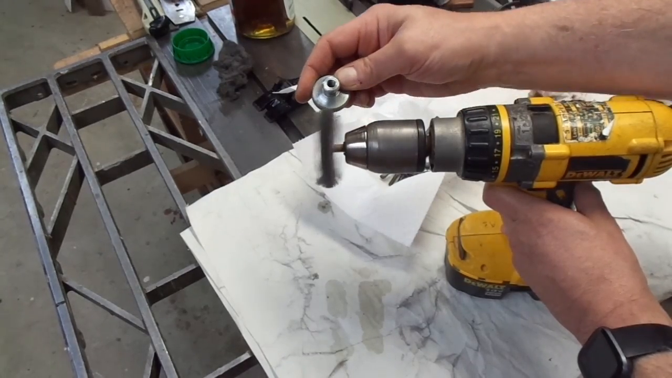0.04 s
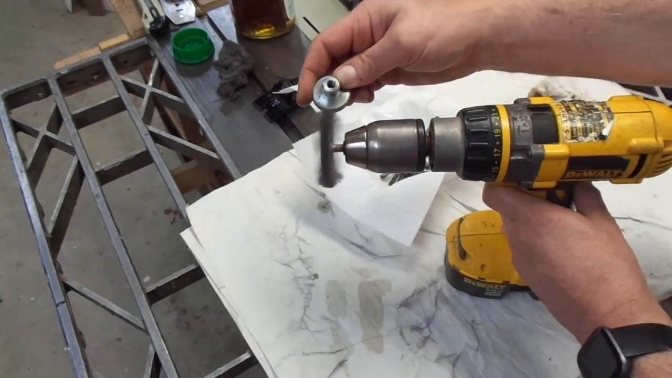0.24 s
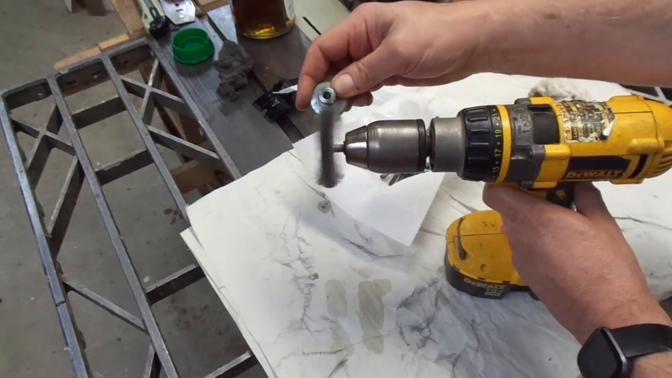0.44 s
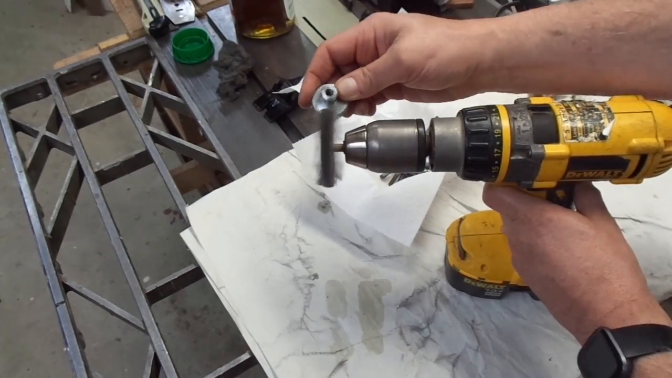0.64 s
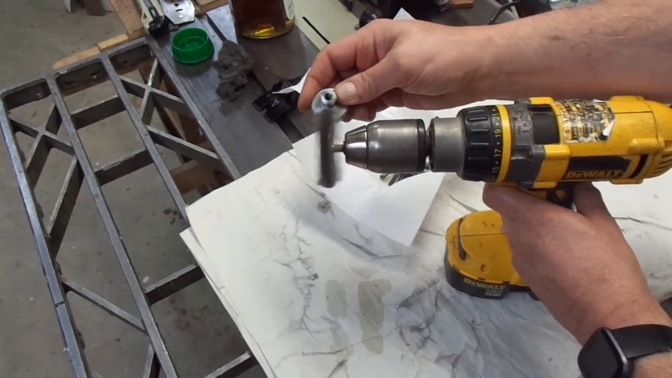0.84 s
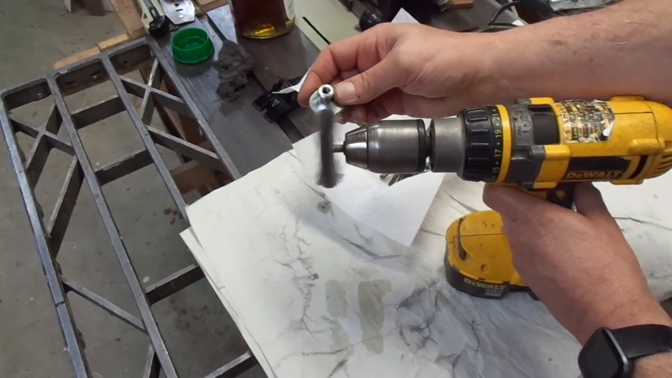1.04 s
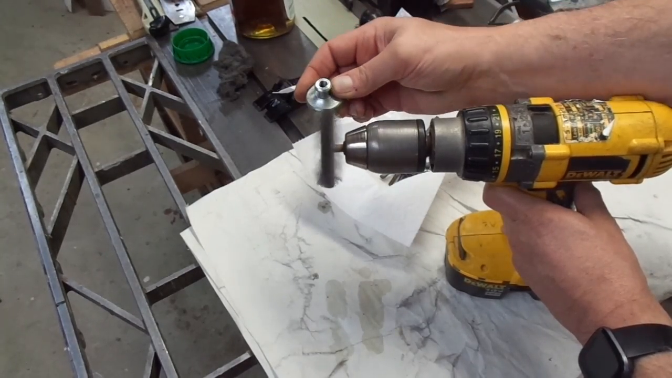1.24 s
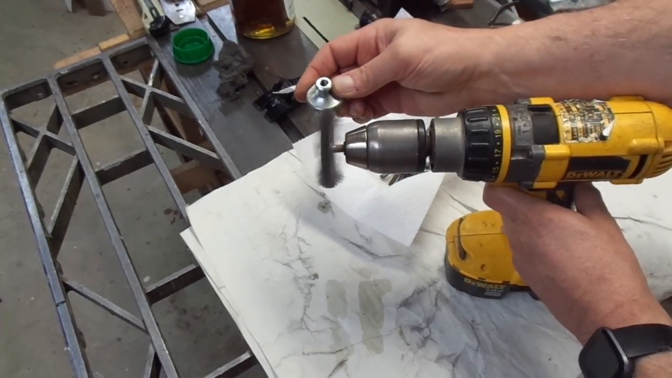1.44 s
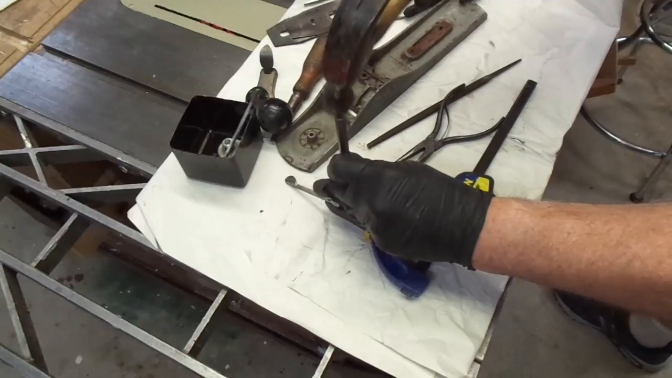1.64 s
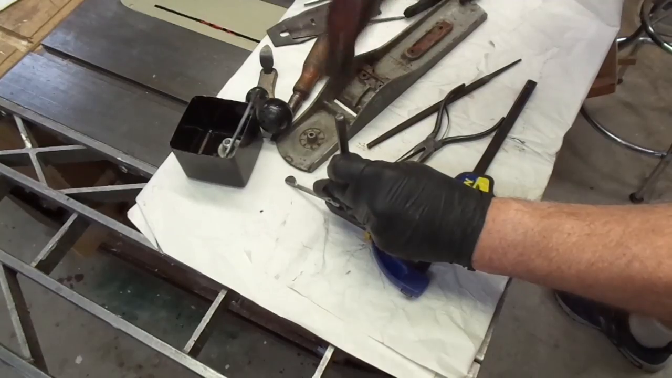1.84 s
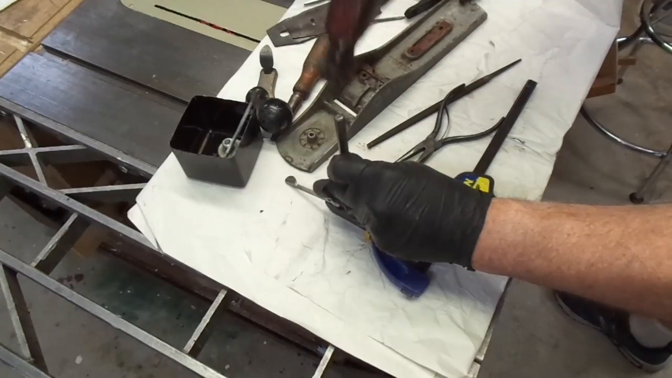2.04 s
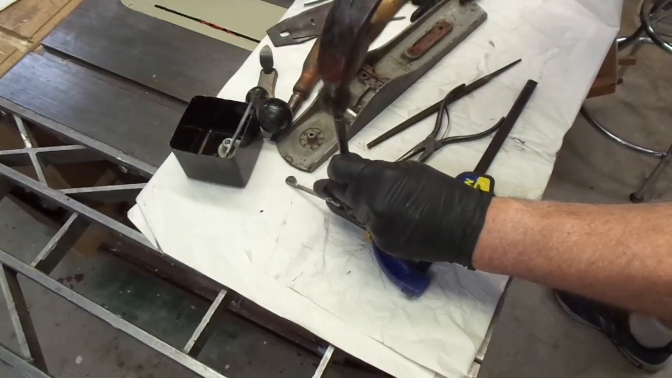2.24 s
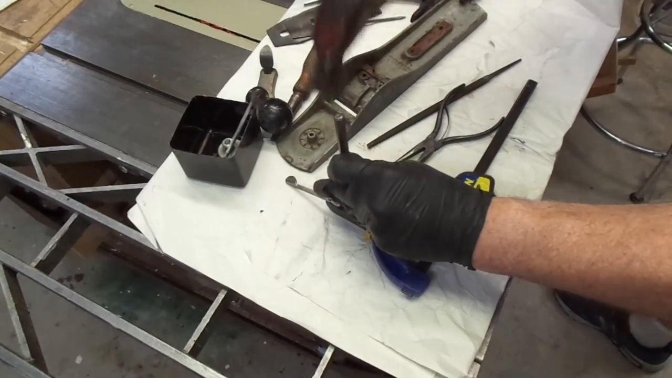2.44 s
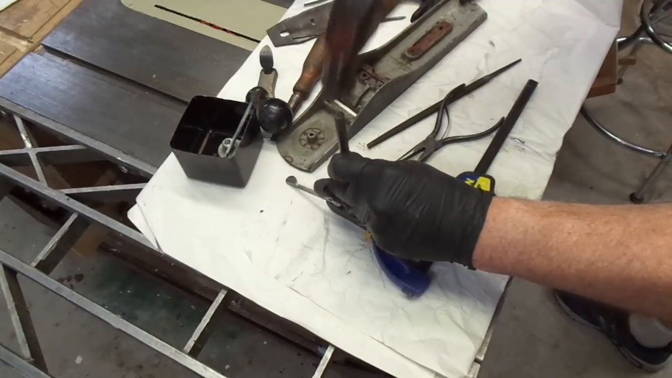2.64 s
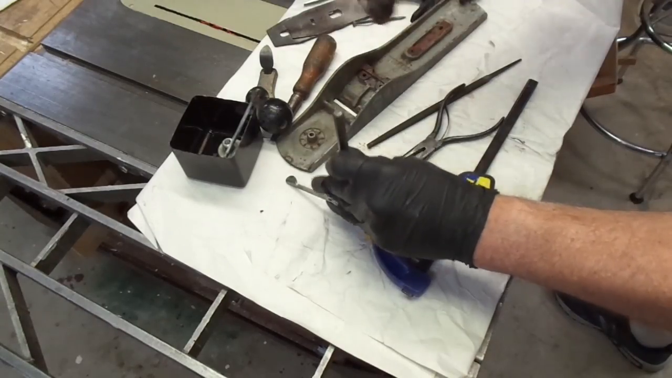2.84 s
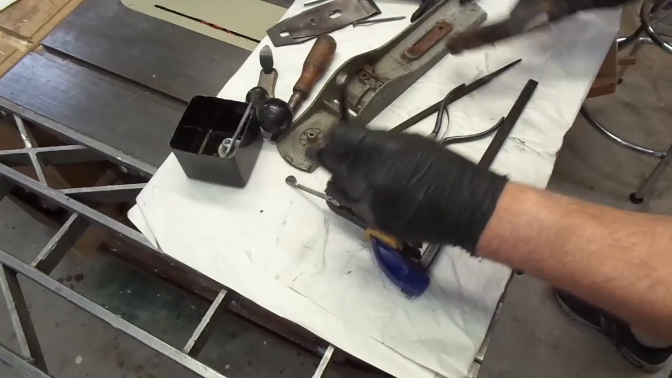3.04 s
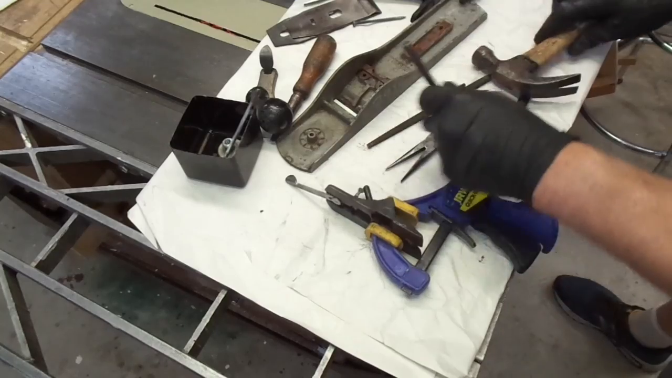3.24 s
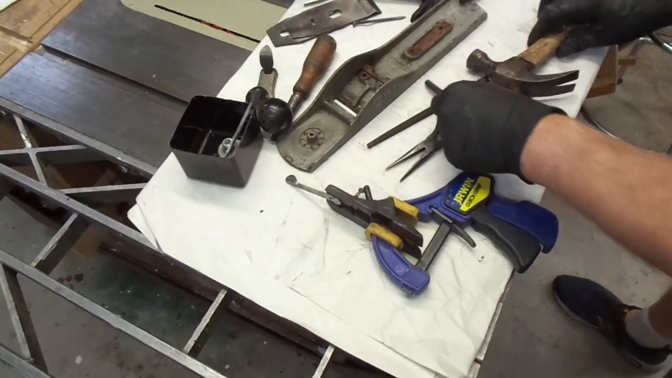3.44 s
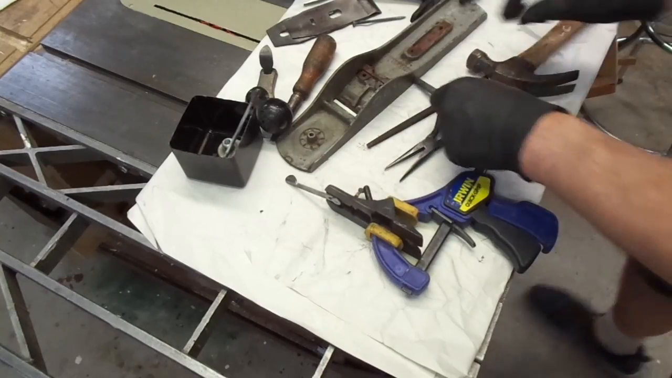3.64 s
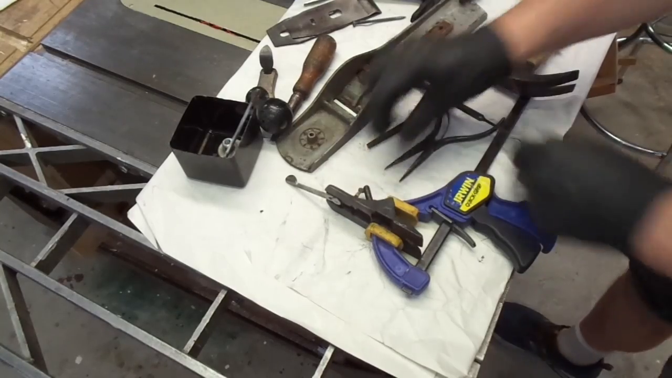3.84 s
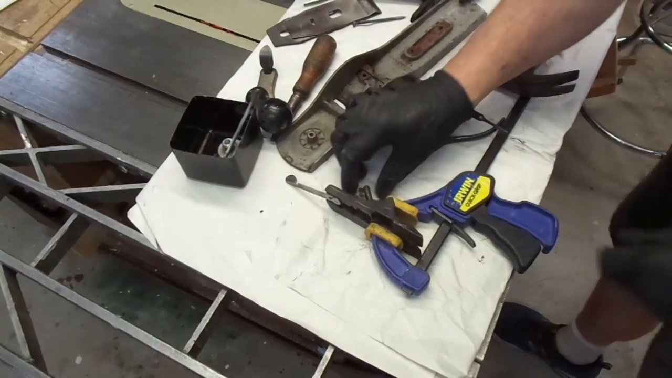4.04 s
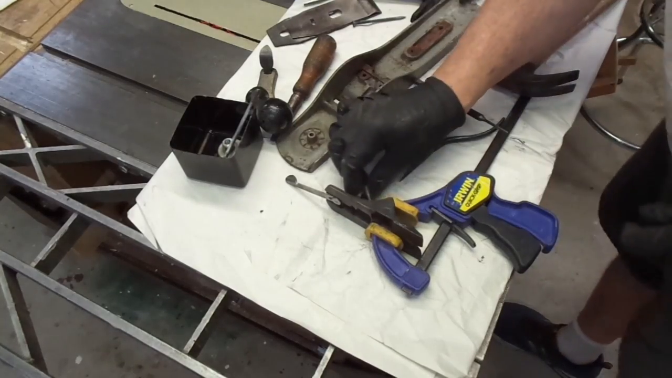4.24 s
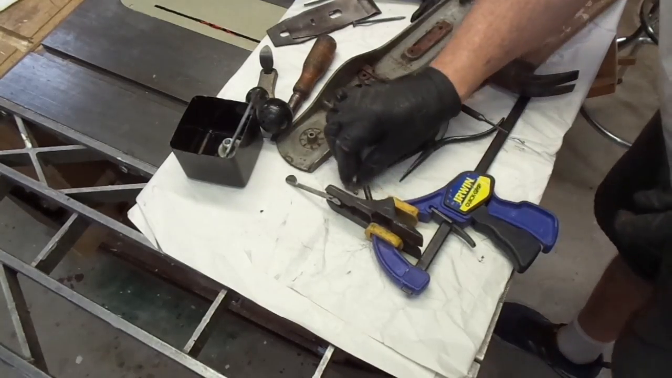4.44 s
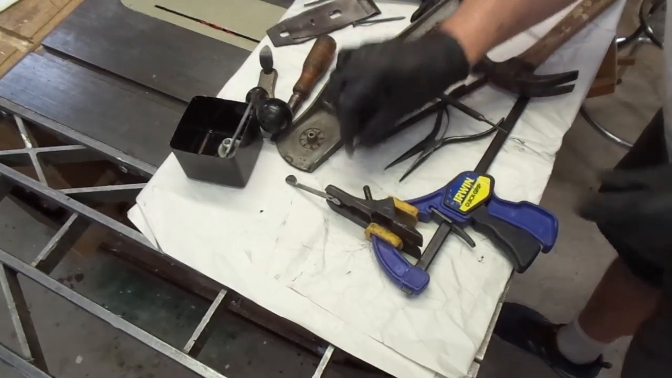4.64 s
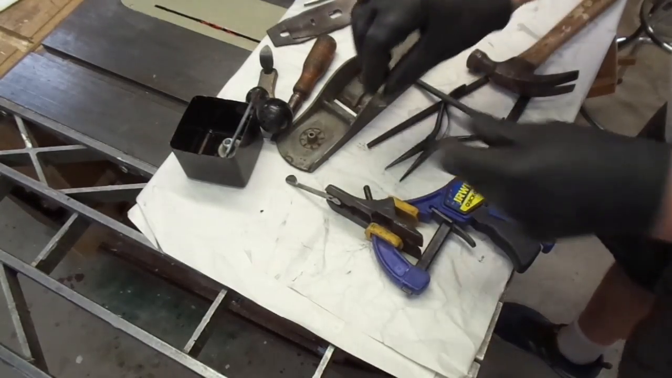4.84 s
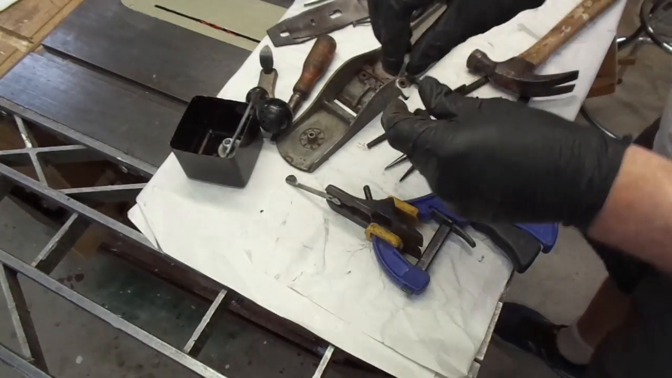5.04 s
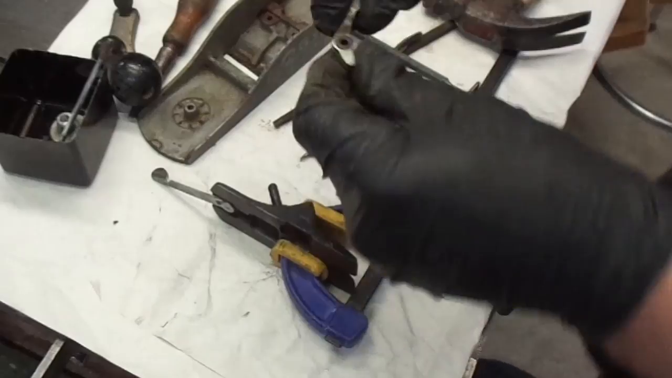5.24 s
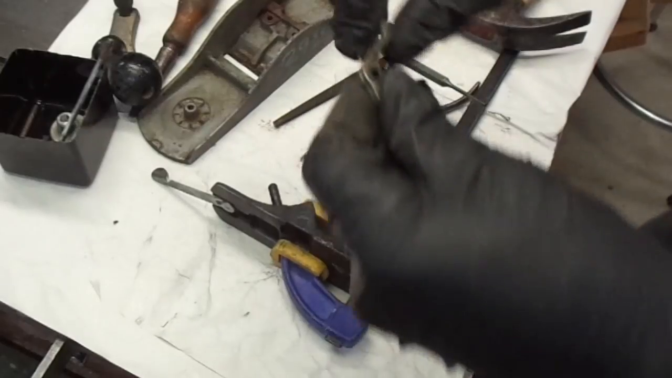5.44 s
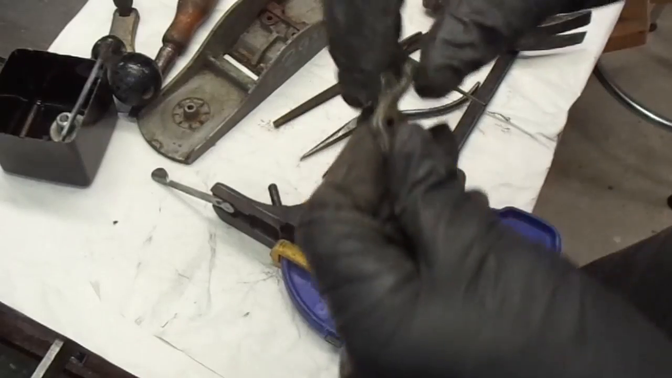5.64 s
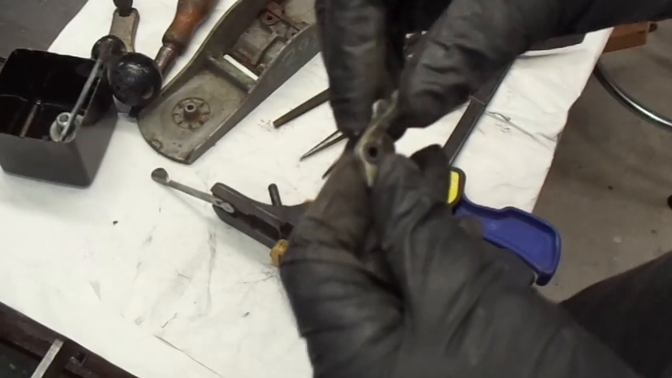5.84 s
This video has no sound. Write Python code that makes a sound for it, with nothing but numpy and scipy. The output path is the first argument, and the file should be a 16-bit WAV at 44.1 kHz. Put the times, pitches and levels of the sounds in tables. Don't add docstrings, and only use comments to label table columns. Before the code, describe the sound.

A cordless drill spinning a wire brush whines high over rough gear roar and bristle hiss, sagging under load and fading out by about a second and a half. Then a quiet humming workshop: four loud, evenly spaced hammer blows on a steel punch, clanging briefly. The hammer is laid down, the punch drops with a click, and gloves rustle. Close microphone, with smeared, watery sped-up treble.

```python
import sys
import numpy as np
from scipy import signal
from scipy.fft import rfft, irfft, next_fast_len
from scipy.io import wavfile
from scipy.ndimage import uniform_filter1d, map_coordinates

SR = 44100
rng = np.random.default_rng(int(sys.argv[2]) if len(sys.argv) > 2 else 0)


def to_linear_factor(level_db):
    exponent = np.asarray(level_db, float) / 20
    return 10 ** exponent


def unload_wav(signal):
    wavfile.write(
        sys.argv[1],
        SR,
        np.round(np.clip(np.atleast_2d(signal).T, -1, 1) * 32767).astype(np.int16),
    )


N = 260631

# time [s], frequency [Hz].
MESH_PITCH = [(0, 1023), (.33, 1019), (.45, 1008), (.52, 980), (.63, 966), (.72, 972), (.8, 962),
              (.88, 942), (1.0, 928), (1.15, 934), (1.58, 932)]
# time [s], level [dB].
TOOTH_LOAD = [(0, 2), (.2, 2), (.3, -5), (.48, -5), (.55, 3), (.66, 2), (.75, -5), (.85, -2), (.92, 4),
              (1.06, 3), (1.15, -4), (1.3, 2)]
CHUCK_ORDERS = [12, 16, 20, 24, 28, 32, 33, 36, 40, 48, 49, 52, 57, 60, 80]
CHUCK_ORDER_DB = [-22, -9, -2, -9.5, -1, -2.5, -11.5, -6, -21, -7.5, 0.5, -1, -5.5, -3, -13.5]
# time [s], frequency [Hz].
WHINE_PITCH = [(0, 4840), (.24, 4835), (.37, 4805), (.44, 4875), (.6, 4930), (.74, 4995), (.85, 4965),
               (.95, 5018), (1.58, 5035)]
# time [s], drag [s], sag of the whine [Hz].
BITES = [(.085, .06, 28), (.17, .04, 28), (.3, .04, 28), (.465, .025, 40), (.686, .085, 155),
         (.884, .035, 105), (1.046, .09, 150), (1.16, .04, 60), (1.21, .04, 50), (1.34, .04, 35)]
# share of the whine pitch [ratio], level over the casing [dB].
ROTOR_TONES = [(.525, -13), (0.61, -19), (.485, -20)]
# frequency [Hz], density [dB per Hz].
CASING_ROAR = [(20, -23), (65, -40), (120, -20.5), (294, -25.5), (348, -6), (392, -17), (442, -14.5),
               (487, -10), (590, -4), (1050, -5), (1400, -5.5), (1650, -10), (2550, -4), (4540, -6.5),
               (4880, -1.5), (6200, -12.5), (8060, -42), (13600, -120)]
# frequency [Hz], density [dB per Hz].
BRISTLE_HISS = [(4500, -61.5), (5800, -3.5), (7000, -1.5), (8200, -2.5), (9000, -4), (10000, -3.5),
                (15000, -7.5)]
# centre [s], half length [s], hiss level [dB].
HISS_STALLS = [(.367, .007, -20), (.431, .008, -20), (.558, .006, -20), (.655, .015, -32),
               (1.01, .008, -18), (1.05, .008, -17), (5.552, .007, -16)]
# frequency [Hz], density [dB per Hz].
SHOP_HUM = [(8.8, -25.5), (15, 8), (19, 12.5), (30, -12.5), (60, -18), (226, -7), (276, -12.5), (319, -6.5),
            (568, -5.5), (758, -7), (1010, -5.5), (2270, -12), (7000, -20.5), (14800, -22)]
# centre [Hz], width [Hz], level [dB].
FAR_MACHINE = [(502, 47, -2.5), (1190, 420, -8), (2020, 200, -5.5), (2350, 29, -5), (4290, 490, -10.5)]
# start [s], peak [dB], splash [dB], brightness above the knee [dB].
HAMMER_BLOWS = [
    (1.605, 3.5, -12.5, -3),
    (1.91, 3, -19.5, -5.5),
    (2.211, 4, -23, 1),
    (2.523, 3.5, -22.5, 3.5),
]
# frequency [Hz], density [dB per Hz].
BLOW_CLANG = [(60, -65.5), (120, -24), (200, -17.5), (372, -5.5), (509, -7), (628, -9.5), (878, -2),
              (1150, -15.5), (1830, -8), (2500, -14), (3150, -6.5), (3800, -10.5), (5560, -16.5),
              (11000, -32.5), (14800, -40), (15500, -69)]
# frequency [Hz], density [dB per Hz].
BLOW_SPLASH = [(6000, -39.0), (9000, -9.5), (10000, -6.0), (13000, -8.0), (14800, -11.5), (15400, -39.5)]
# frequency [Hz], t60 [s].
CONTACT_DECAY = [(100, 0.55), (260, 0.36), (700, 0.38), (1840, 0.31), (4850, 0.23), (12800, 0.13)]
# frequency [Hz], t60 [s], level at each of the four blows [dB].
BENCH_MODES = [(446.5, 1.4, -34.5, -36, -31, -44), (608, 1.3, -38, -36.5, -33.5, -38.5),
               (686, 1, -34, -33, -34.5, -34), (899, 0.64, -26, -30, -23.5, -25),
               (1138, 0.52, -29, -29.5, -24, -36), (1530, 0.58, -31.5, -32, -25.5, -24),
               (2020, 1.1, -44, -46, -40, -57.5), (2095, 0.67, -31.5, -31, -36, -31.5),
               (2388, 0.73, -30.5, -29.5, -27.5, -39)]
# frequency [Hz], level [dB], t60 [s].
LEG_MODES = [(125.4, -33.5, 0.39), (173.5, -32, 0.27)]
CLAMP_PITCH = [388, 516, 741, 785, 840, 897, 966, 1252, 1400, 1632, 1696, 1850, 2047, 2390, 2735, 2900,
               3005, 3200, 3287, 3400, 3600, 4264, 4716, 5230, 6200]
# t60 [s], level at each of the four blows [dB].
CLAMP_RING = [(0.16, -21, -27, -24.5, -26), (0.22, -14, -19, -16.5, -28.5), (.24, -18.5, -18, -21, -18.5),
              (0.46, -20, -22.5, -22.5, -23), (0.28, -20, -25, -24, -23.5),
              (0.13, -16.5, -18.5, -18.5, -11), (0.25, -17.5, -22, -22, -20.5),
              (0.17, -22.5, -26.5, -15, -38), (.25, -25.5, -30, -33, -33.5),
              (0.16, -29.5, -31.5, -26.5, -18), (.25, -27.5, -31, -22.5, -29),
              (0.18, -17.5, -24.5, -20, -20.5), (0.25, -19.5, -26.5, -25.5, -27),
              (0.16, -33, -32, -28.5, -44), (0.12, -20.5, -20.5, -34, -28.5),
              (0.17, -8.5, -13, -30.5, -10.5), (0.24, -18, -20, -27.5, -24), (.05, -12, -15.5, -11, -5.5),
              (0.1, -12.5, -12, -10, -7.5), (0.054, -14, -17, -11, -11.5), (0.089, -29, -28, -18.5, -30.5),
              (0.26, -36, -38.5, -31, -21), (.24, -35.5, -43, -31.5, -27.5),
              (0.095, -31, -37, -27.5, -28.5), (0.17, -40.5, -46, -36, -35)]
PUNCH_PITCH = [7295, 8161, 8705, 9017, 9512, 9625, 9964, 10200, 11300, 12070, 12400, 12766, 13130, 13680,
               14570, 14914]
# t60 [s], level at each of the four blows [dB].
PUNCH_RING = [(.1, -50.5, -50, -39.5, -21.5), (.11, -50.5, -39, -40.5, -35.5), (0.13, -18.5, -25, -16, -29),
              (0.19, -32, -39.5, -38.5, -47.5), (0.085, -24.5, -33.5, -35.5, -37),
              (0.1, -24.5, -36.5, -38, -42.5), (.12, -31, -34, -37, -42), (0.16, -28.5, -32.5, -39.5, -42),
              (0.13, -30.5, -32, -39.5, -39), (.12, -25, -32, -39, -37.5), (0.035, -10, -8, -30, -27),
              (0.13, -15, -17.5, -29, -22.5), (.13, -21, -24.5, -45, -33.5),
              (.11, -31.5, -32.5, -47.5, -44), (.05, -21, -27.5, -46.5, -43.5), (.06, -32.5, -49, -45, -55)]
# start [s], peak [dB], thud [dB], head [dB], scrape [dB].
HAMMER_LAID = [
    (2.92, -47.5, 12, -6, -4),
    (3.149, -20.5, -11, 3.5, -30),
    (3.16, -34.5, -20, 4.5, -42.5),
    (3.177, -32.5, 5, 0, -26),
    (3.243, -28.5, -35, -7, 2),
    (3.247, -28, 9.5, -30.5, -19),
    (3.264, -39, 12.5, -28, -25),
    (3.284, -37, 7, -8, -8),
]
# frequency [Hz], level [dB], t60 [s].
HEAD_MODES = [(667, 0, 0.05), (898, -6, 0.2), (1534, 0, 0.09), (1739, 2, 0.24), (2056, -9, 0.45),
              (1930, 0, 0.05), (2890, -3, .1), (3350, -8, 0.06)]
# frequency [Hz], level [dB], t60 [s].
THUD_MODES = [(150, -21, .2), (200, -16, .22), (330, -18, .3), (430, -12, .5), (510, 1, .08),
              (720, -17, .5)]
# frequency [Hz], level [dB], t60 [s].
CLAW_MODES = [(3000, -3, .08), (5600, -3, .09), (8100, -7, .07), (10000, -5, .04)]
# frequency [Hz], density [dB per Hz].
HEAD_CONTACT = [(90, -45), (250, -13), (900, -8), (1700, 9), (3200, -6.5), (7000, -41), (16000, -80)]
SCRAPE = [(300, -41.0), (1500, -3.5), (3500, -3.5), (11000, -14.0), (14500, -30.0), (15500, -75)]
# time [s], level [dB].
GLOVE_MOTION = [(3.3, -59), (3.52, -54.5), (3.7, -60), (3.85, -66), (4.2, -63), (4.5, -74)]
# frequency [Hz], density [dB per Hz].
PAPER_RUSTLE = [(500, -36), (1200, -10), (2000, 3.5), (3500, -2.5), (6500, -5.5), (10000, -33)]
# start [s], peak [dB], high ring [dB].
PUNCH_DROPPED = [
    (3.458, -15, -14),
    (3.464, -19, -9),
    (3.478, -31, -12),
    (3.513, -43, -12),
]
# frequency [Hz], level [dB], t60 [s].
ROD_MODES = [(2000, -19, .08), (2923, 4, .04), (3187, -12, .07), (4716, -20, .15), (7111, -11, .14),
             (9146, -4, .14), (11050, -5, .11), (11820, -11, .1), (14870, -19, .09)]
# frequency [Hz], density [dB per Hz].
ROD_CONTACT = [(200, -70), (700, -41), (2500, -5.5), (5000, -7.0), (9000, -9), (14500, -18), (15300, -68)]
PART_CONTACT = [(200, -40), (800, -8), (3000, 7.5), (11000, -12.5), (15000, -46)]
# start [s], peak [dB], rustle [dB].
PARTS_TOUCHED = [(3.6316, -35, -22), (3.6654, -39.5, -15.5), (3.693, -36.5, -19.5), (3.7744, -54, -12),
                 (3.921, -50, -8), (4.1075, -57, -5)]
# frequency [Hz], level [dB], t60 [s].
PART_MODES = [(1390, -13, 0.34), (2567, -5, 0.13), (3270, 4.5, 0.084), (4300, 2, 0.056)]
# frequency [Hz], side over mid [dB].
STEREO_SPREAD = [(60, -2), (110, -2.5), (200, -8.5), (380, -5), (700, -9.5), (1290, -4.5), (2380, -3),
                 (4400, 2.5), (8120, 11.5), (15000, -4.5)]
# start [s], side over mid [dB], share of the spread [ratio], side top [Hz].
STEREO_WIDTH = [(0, -19, 0.16, 9500), (.155, -82, 0, 9000), (1.575, -5, 0.91, 17200), (2.5, 1, -0.2, 17500),
                (4, -2.5, -1, 5120), (5.22, -79, -0.072, 5000), (5.73, -18, 0.28, 8930)]
# start [s], length [s], start, last low, last high [Hz].
CHANNEL_SLIPS = [(1.612, .288, 7800, 6500, 8500), (1.72, .18, 8500, 8500, 8700),
                 (1.92, .04, 7700, 7900, 7500), (1.67, .05, 13300, 14000, 12700),
                 (2.78, .08, 9000, 8500, 9400), (1.99, .19, 11800, 11600, 12800),
                 (2.04, .13, 13000, 12500, 14500), (2.23, .1, 14500, 14200, 20000),
                 (2.54, .07, 14300, 14300, 20000), (2.7, .15, 13800, 13700, 14000),
                 (3.39, .06, 950, 880, 980), (3.45, .075, 600, -2500, 1000), (3.45, .075, 850, 600, 950),
                 (3.145, .02, 8500, 7500, 9500), (3.7, .85, 1200, 500, 700), (4.45, .45, 650, 300, 820),
                 (4.55, .66, 450, -1500, 600), (3.62, .19, 7000, 8000, 9500),
                 (3.55, .05, 15500, 14000, 20000), (3.755, .055, 14800, 10500, 20000),
                 (3.81, .11, 12800, 12600, 13600), (2.05, .12, 9500, 8800, 11000),
                 (3.92, .14, 9800, 11600, 400000), (4.06, .29, 9500, 7800, 400000),
                 (4.35, .23, 13200, 13400, 400000), (4.58, .12, 13400, 16000, 400000)]

TOP_HZ = 15000
STREAK_DB, STREAK_HZ = 3.5, 5300
TEETH = 45
MESH_DB, OCTAVE_DB, MESH_SWING_DB = -10, -12, 1.8
RECOVER_S = .02
CASING_DB, BRISTLE_DB, WHINE_DB = -27.5, -9.5, -0.1
FADE_FROM_S, FADE_TO_S = 0.54, 1.571
CUT_S = 1.574
HUM_DB, STIR_S, STIR_DB, SETTLE_S = -57.5, 3.45, 8, 0.049
AWAKE_DB = 1
NEXT_S, NEXT_RISE_S, NEXT_DB, FAR_DB = 5.005, 0.65, 4.5, -56
KNEE_HZ = 3500
LEAD_S = .028
THUD_SAG, SAG_S = .25, .05


def unit(x):
    return x / np.sqrt(np.mean(x ** 2) + 1e-20)


def along(points, hz):
    f, v = np.transpose(points)
    return np.interp(np.log(hz + 1), np.log(f + 1), v)


def curves(rows):
    s, *cols = np.transpose(rows)
    return [np.interp(np.arange(N) / SR, s, c) for c in cols]


def wobble(rate):
    knots = rng.standard_normal(int(N * rate / SR) + 4)
    return map_coordinates(knots, [np.arange(N) * rate / SR])


def patches(shape, high, long):
    field = uniform_filter1d(rng.standard_normal(shape), size=high, axis=0)
    return unit(uniform_filter1d(field, size=long, axis=1))


def noise(gain, size):
    hz, t, z = signal.stft(rng.standard_normal(size), SR, nperseg=256)
    return signal.istft(z * gain(hz[:, None], t), SR, nperseg=256)[1][:size]


def coloured(spectrum, kept=1, size=N):
    padded = next_fast_len(size)
    hz = np.fft.rfftfreq(padded, 1 / SR)
    comb = (rng.random(SR // 40) < kept)[(hz // 40).astype(int)]
    z = rfft(rng.standard_normal(size), padded) * to_linear_factor(along(spectrum, hz)) * comb * (hz < TOP_HZ)
    return unit(irfft(z)[:size])


def tone(hz, rough_hz):
    cycles = np.cumsum(hz + rough_hz * wobble(60)) / SR + rng.random()
    return np.sqrt(2) * np.sin(2 * np.pi * cycles)


def stuttering(spectrum, share, stalls):
    t, out = np.arange(-2048, 2048) / SR, coloured(spectrum)
    for s, half, db in stalls:
        dip = to_linear_factor(share * db * np.exp(-(t / half) ** 4))
        near = slice(round(s * SR) - len(t) // 2, round(s * SR) + len(t) // 2)
        narrow = coloured(spectrum, kept=.16, size=len(t))
        out[near] = dip * out[near] + to_linear_factor(-5) * (1 - dip) * narrow
    return out


def ring(modes, t, rise, scatter_db, rough, size=350, sag=0):
    hz, db, t60 = np.transpose(modes)[:, :, None]
    draw = rng.standard_normal((len(modes), 2, 1))
    flutter = 1 + rough * patches((len(modes), len(t)), 1, size)
    decay = to_linear_factor(db + scatter_db * draw[:, 0] - 60 * t / t60)
    slowed = t - sag * (t - SAG_S * (1 - np.exp(-t / SAG_S)))
    waves = decay * flutter * np.sin(2 * np.pi * (hz * slowed + draw[:, 1]))
    return waves.sum(0) * (1 - np.exp(-t / rise))


def burst(spectrum, size, quick, lead, patchy_db=3.0):
    t = np.arange(size) / SR - LEAD_S

    def gain(hz, s):
        streaks_db = patchy_db * patches((len(hz), len(s)), 1, 30)
        dying_db = 60 * np.maximum(s - LEAD_S, 0) / (quick * along(CONTACT_DECAY, hz))
        return to_linear_factor(along(spectrum, hz) + streaks_db - dying_db)

    puff = noise(gain, size)
    puff = signal.lfilter(*signal.butter(2, 80 / SR * 2, "high"), puff)
    before = np.minimum(t, 0)
    swell = np.exp(before / lead) + to_linear_factor(-25) * np.exp(before / .013)
    contact = puff[(t > 0) & (t < .01)]
    return puff / np.sqrt(np.mean(contact ** 2)) * np.minimum(swell, 1)


def add(track, sound, s):
    track[round(s * SR):][:len(sound)] += sound


def whine():
    t, hz = np.arange(N) / SR, curves(WHINE_PITCH)[0]
    for s, drag, sag_hz in BITES:
        dragging = np.clip(1 + (t - s) / drag, 0, 1)
        hz = hz - sag_hz * np.where(t < s, dragging, np.exp(-np.abs(t - s) / RECOVER_S))
    return hz


def drill():
    t, mesh, motor_hz = np.arange(N) / SR, curves(MESH_PITCH)[0], whine()
    chuck = mesh / TEETH
    gears = to_linear_factor(MESH_DB + MESH_SWING_DB * wobble(6)) * tone(mesh, rough_hz=1.9)
    gears += to_linear_factor(OCTAVE_DB + curves(TOOTH_LOAD)[0] + wobble(6)) * tone(2 * mesh, rough_hz=6)
    for k, db in zip(CHUCK_ORDERS, CHUCK_ORDER_DB):
        gears += to_linear_factor(-13) * to_linear_factor(db + k / 14 * wobble(14)) * tone(k * chuck, rough_hz=.004 * k * k + 1.5)
    lull_db = sum(.6 * db * np.exp(-((t - s) / half) ** 4) for s, half, db in HISS_STALLS)
    gears = to_linear_factor(.4 * lull_db) * gears
    for share, db in ROTOR_TONES:
        gears += to_linear_factor(lull_db + db + 2.5 * wobble(18)) * tone(share * motor_hz, rough_hz=28)
    rough_hz = np.interp(t, [.4, 1], [11, 5])
    motor = to_linear_factor(WHINE_DB - 2.5 * t + 1.3 * wobble(25)) * tone(motor_hz, rough_hz)
    beat = np.sin(2 * np.pi * np.cumsum(4 * chuck) / SR)
    casing = to_linear_factor(1.0 + 0.92 * beat + .7 * wobble(12)) * stuttering(CASING_ROAR, 0.95, HISS_STALLS[:-1])
    casing *= to_linear_factor(1.2 * wobble(150))
    bristles = to_linear_factor(BRISTLE_DB + 0.6 * wobble(500) + 0.45 * wobble(16.3))
    bristles *= stuttering(BRISTLE_HISS, 0.45, HISS_STALLS[:-1])
    fade = np.clip((FADE_TO_S - t) / (FADE_TO_S - FADE_FROM_S), 0, 1) * (t < CUT_S)
    return to_linear_factor(CASING_DB) * fade * (casing + bristles + gears + motor)


def shop():
    hz, t = np.geomspace(200, 8000, num=200), np.arange(N) / SR
    bands = sum(to_linear_factor(db) / (1 + (2 * (hz - c) / w) ** 2) for c, w, db in FAR_MACHINE)
    coming = np.clip((t - NEXT_S) / NEXT_RISE_S, 0, 1)
    far = coloured(np.c_[hz, 20 * np.log10(bands)]) * to_linear_factor(FAR_DB) * coming ** 2
    stir_db = STIR_DB * np.exp(-np.abs(t - STIR_S) / SETTLE_S) + AWAKE_DB * (t > STIR_S)
    hum = to_linear_factor(HUM_DB + stir_db + NEXT_DB * coming + 1.3 * wobble(1.9)) * (t > CUT_S)
    return hum * stuttering(SHOP_HUM, 0.5, HISS_STALLS[-1:]) + far


def hammer():
    out, t = np.zeros(N + SR), np.arange(3 * SR // 4) / SR
    short = t[:len(t) // 2]
    for k, (s, db, splash_db, bright_db) in enumerate(HAMMER_BLOWS):
        def struck(modes):
            return np.array(modes)[:, [0, 2 + k, 1]]

        clang = [(hz, level + bright_db * (hz > KNEE_HZ)) for hz, level in BLOW_CLANG]
        tail = burst(clang, len(t), quick=1.165, lead=0.00051, patchy_db=2.5)
        crack = burst(clang, len(short), quick=0.24, lead=0.0024)
        splash = burst(BLOW_SPLASH, len(short), quick=1.1, lead=0.0015, patchy_db=6.5)
        add(out, to_linear_factor(db - 18.5) * tail, s - LEAD_S)
        add(out, to_linear_factor(db - 16.5) * crack, s - LEAD_S)
        add(out, to_linear_factor(db + splash_db - 11.5) * splash, s - LEAD_S)
        bench = ring(struck(BENCH_MODES), t, rise=.004, scatter_db=0, rough=.4, size=1600)
        legs = ring(LEG_MODES, short, rise=0.012, scatter_db=2.0, rough=0.54, size=1500)
        clamp_modes = struck(np.c_[CLAMP_PITCH, CLAMP_RING])
        clamp = ring(clamp_modes, short, rise=.002, scatter_db=0, rough=.3, size=500)
        punch_modes = struck(np.c_[PUNCH_PITCH, PUNCH_RING])
        punch = ring(punch_modes, short, rise=.002, scatter_db=0, rough=.45)
        add(out, bench, s)
        add(out, legs, s)
        add(out, to_linear_factor(1.5) * clamp, s)
        add(out, to_linear_factor(0.5) * punch, s)
    return out[:N]


def lay_hammer(out, t):
    for s, db, thud_db, head_db, scrape_db in HAMMER_LAID:
        head = ring(HEAD_MODES, t, rise=.001, scatter_db=1, rough=.35)
        thud = ring(THUD_MODES, t, rise=0.0024, scatter_db=1, rough=0.2, size=1400, sag=THUD_SAG)
        contact = burst(HEAD_CONTACT, len(t), quick=0.6, lead=0.004)
        scrape = burst(SCRAPE, len(t), quick=0.42, lead=0.0071)
        claw = ring(CLAW_MODES, t, rise=.004, scatter_db=3.0, rough=.5)
        add(out, to_linear_factor(db + head_db - 7) * head, s - .001)
        add(out, to_linear_factor(db + thud_db - 6.0) * thud, s)
        add(out, to_linear_factor(db + head_db - 11) * contact, s - LEAD_S)
        add(out, to_linear_factor(db + scrape_db - 5.5) * scrape, s - LEAD_S)
        add(out, to_linear_factor(db + scrape_db - 6) * claw, s - .002)


def drop_punch(out, t):
    for s, db, high_db in PUNCH_DROPPED:
        low = ring(ROD_MODES[:4], t, rise=0.001, scatter_db=1.0, rough=0.3, size=150)
        high = ring(ROD_MODES[4:], t, rise=.004, scatter_db=1, rough=.3)
        contact = burst(ROD_CONTACT, len(t), quick=0.3, lead=0.003)
        add(out, to_linear_factor(db - 4.5) * low, s - .002)
        add(out, to_linear_factor(db + high_db + 3) * high, s - .002)
        add(out, to_linear_factor(db - 18.5) * contact, s - LEAD_S)


def touch_parts(out, t):
    for s, db, rustle_db in PARTS_TOUCHED:
        parts = ring(PART_MODES, t, rise=.005, scatter_db=2, rough=0.48)
        rustle = burst(PART_CONTACT, len(t), quick=0.6, lead=0.006)
        add(out, to_linear_factor(db - 10) * parts, s - .002)
        add(out, to_linear_factor(db + rustle_db + 1) * rustle, s - LEAD_S)


def tools():
    out, t = np.zeros(N + SR), np.arange(SR // 3) / SR
    lay_hammer(out, t)
    drop_punch(out, t)
    touch_parts(out, t)
    return out[:N]


def gloves():
    t = np.arange(N) / SR
    moving = (t > GLOVE_MOTION[0][0]) & (t < GLOVE_MOTION[-1][0])
    level_db = curves(GLOVE_MOTION)[0] + 1.6 * wobble(25) + 1.7 * wobble(300)
    return moving * to_linear_factor(level_db) * coloured(PAPER_RUSTLE)


def slipping(hz, t):
    inside = np.zeros(hz.shape, bool)
    for s, length, start, low, high in CHANNEL_SLIPS:
        u = (t - s) / length
        above = hz > .92 * start + u * (low - start)
        below = hz < 1.08 * start + u * (high - start)
        inside |= (u > 0) & (u < 1) & above & below
    return inside


def compressed_stereo(mono):
    hz, t, mid = signal.stft(mono, SR, nperseg=1024)
    hz = hz[:, None]
    starts, *columns = np.transpose(STEREO_WIDTH)
    stretch = np.maximum(np.searchsorted(starts, t) - 1, 0)
    side_db, share, top = (c[stretch] for c in columns)
    turn = to_linear_factor(side_db + share * (along(STEREO_SPREAD, hz) + 3.0)) * (hz < top)
    turn = turn * np.tanh(3.1 * patches(mid.shape, 8, 24))
    edge = hz * (1 + .03 * patches(mid.shape, 6, 8))
    loose = patches(mid.shape, 7, 12)
    held = (loose < -1) & (t > 4.03) & (t < 4.36) & (hz > 7000)
    stray = (loose > 1.35) & (hz > 3500) & (t > 1.62) & (t < 4.2)
    slipped = slipping(edge, t) & ~held | stray
    streaked = (hz > STREAK_HZ) * ((t < CUT_S) | (t > 3.6))
    mid = mid * to_linear_factor(STREAK_DB * patches(mid.shape, 2, 5) * streaked - 0.5)
    side = 1j * mid * np.where(slipped, 1, turn)
    mid = np.where(slipped, to_linear_factor(np.where(hz < 2000, -14, -42)) * mid, mid)
    return signal.istft(np.array([mid + side, mid - side]), SR, nperseg=1024)[1][:, :N]


def scene():
    return compressed_stereo(drill() + shop() + hammer() + tools() + gloves())


def low_pass(x):
    return signal.sosfilt(signal.butter(12, 15690, fs=SR, output="sos"), x)


def record(dry):
    heard = signal.lfilter(*signal.butter(1, 20 / SR * 2, "high"), dry)
    mix = np.clip(0.89 * heard, -1, 1)
    return low_pass(mix)


dry = scene()
out = record(dry)
unload_wav(out)
```